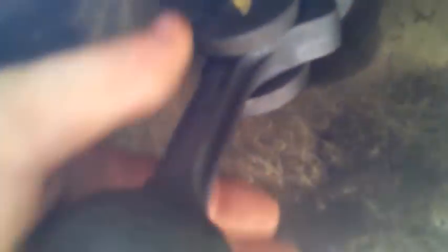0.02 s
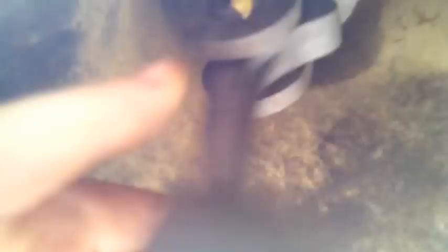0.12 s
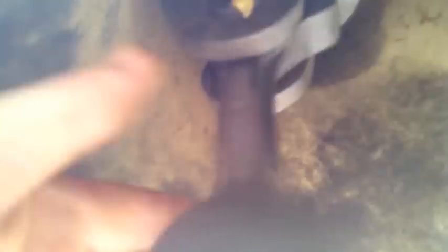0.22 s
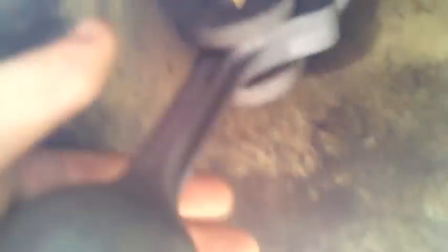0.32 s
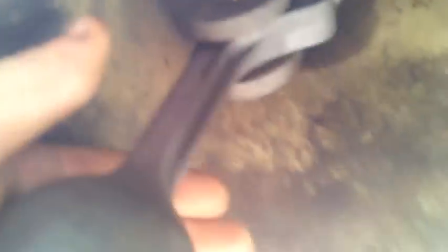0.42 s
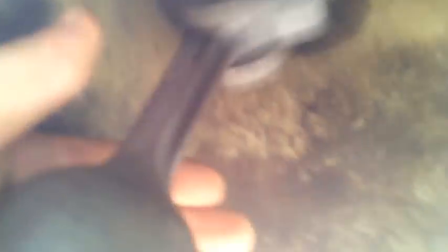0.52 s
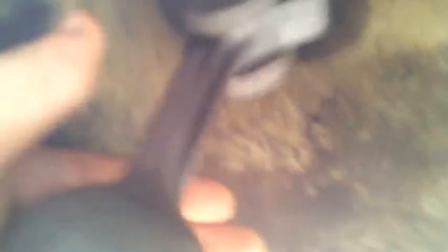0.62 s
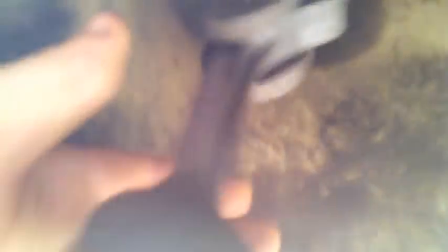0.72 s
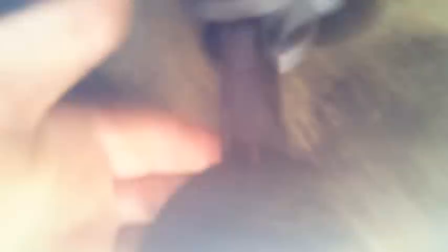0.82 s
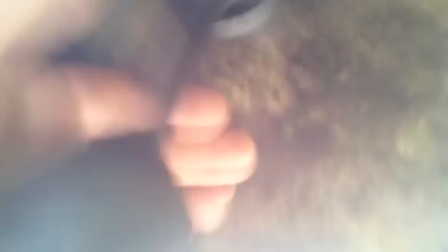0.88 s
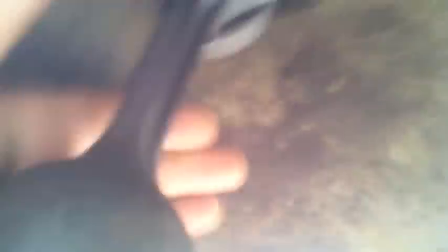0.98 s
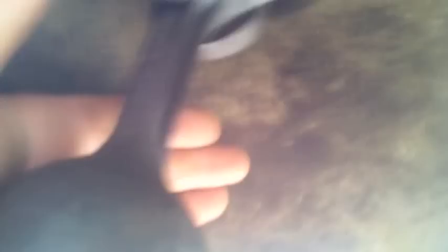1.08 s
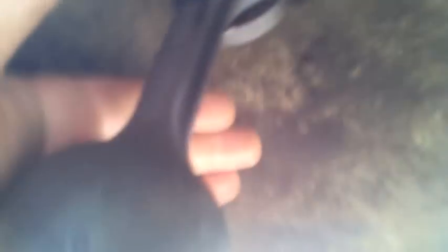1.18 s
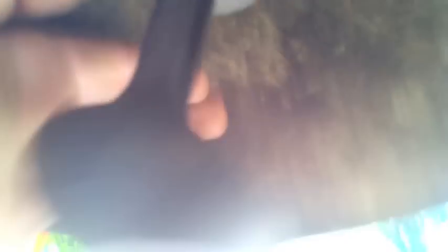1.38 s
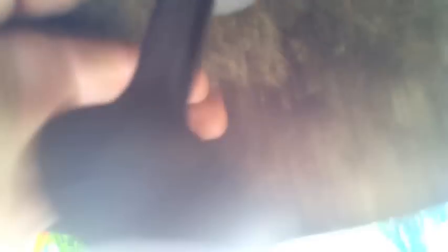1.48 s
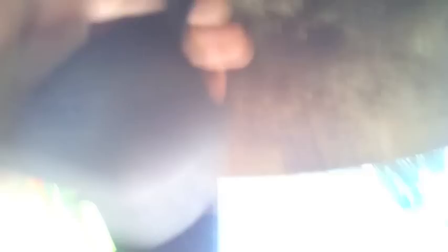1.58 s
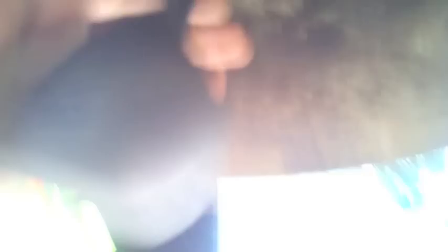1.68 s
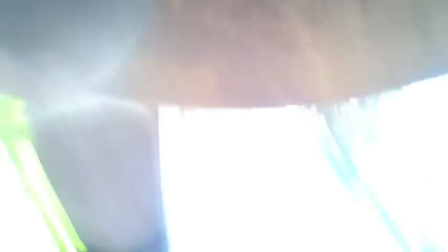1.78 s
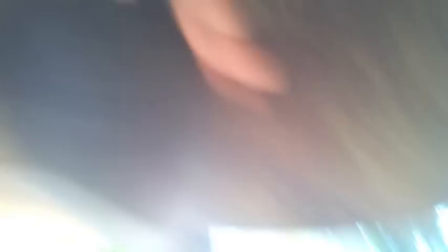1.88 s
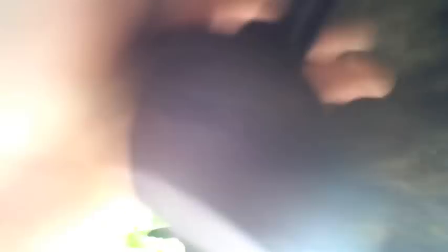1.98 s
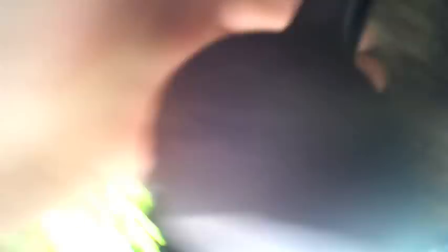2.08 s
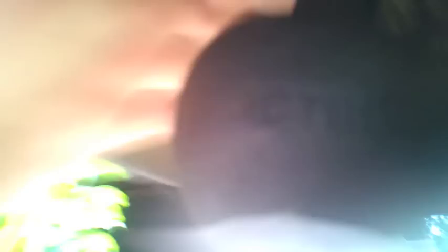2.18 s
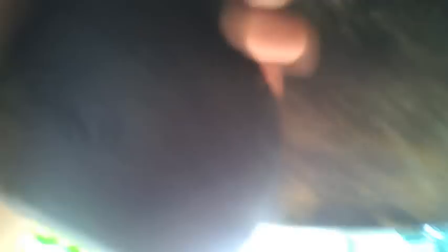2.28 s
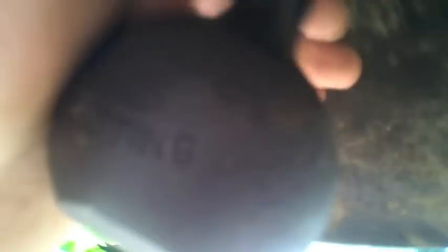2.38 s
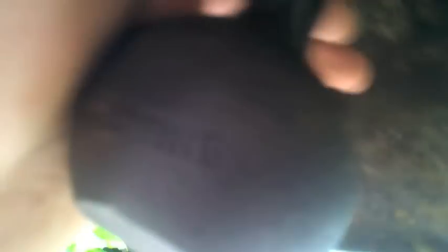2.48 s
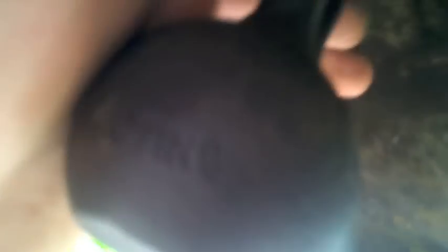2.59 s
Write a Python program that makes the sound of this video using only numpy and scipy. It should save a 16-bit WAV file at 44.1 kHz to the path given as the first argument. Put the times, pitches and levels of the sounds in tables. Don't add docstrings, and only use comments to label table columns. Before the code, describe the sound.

An air-driven clapper strikes a damped steel bell steadily, bouncing lightly and hissing, over a faint compressor drone

```python
import sys
import numpy as np
from scipy import signal
from scipy.fft import rfft, irfft
from scipy.io import wavfile
from scipy.ndimage import map_coordinates

SR = 44100
rng = np.random.default_rng(int(sys.argv[2]) if len(sys.argv) > 2 else 0)


def master_out(mix):
    frames = np.transpose(np.atleast_2d(mix))
    ceiling = np.clip(frames, -1, 1)
    pcm = np.round(ceiling * 32767).astype(np.int16)
    wavfile.write(sys.argv[1], SR, pcm)


def boost(x):
    u = np.asarray(x, float) / 20
    return 10 ** u


N = 114660

# t/s, level/dB, low thump/dB, long ring/dB, valve tick/dB
BLOWS = [
    (0.2007, -13, -28, -46, -33),
    (.8500, -13, -18, -43, -31),
    (1.4969, -14.5, -14.5, -47.5, -30),
    (2.1439, -13, -27.5, -38.5, -33),
]
# t/s, level/dB, clink f/Hz, clink level/dB
REBOUNDS = [
    (0.268, -32, 4180, -38),
    (0.922, -36, 4210, -35),
    (1.5686, -31, 4000, -31),
    (2.2189, -32, 4170, -26),
]
# t/s, level/dB, after-hiss/dB, ring from the piston's return/dB
PUFFS = [
    (.358, -20.5, -35.5, -52),
    (1.009, -20, -38, -48),
    (1.654, -20.5, -43.5, -54.5),
    (2.302, -20, -40.5, -62),
]

BELL_HZ = [2091, 3811, 5175, 5620, 5921, 6097, 7461, 7667, 9078, 9396, 9467, 10970, 12010, 12440]
# level/dB, time to fade by 60 dB/s
BELL_RING = [(-51, .6), (-48, .8), (-37, .22), (-44, .35), (-37, .27), (-36, .65), (-48, .3), (-22, .3),
             (-42, .5), (-33, .2), (-35, .45), (-38, .35), (-38, .45), (-44, .4)]
LONG_HZ = [3585, 3589]
# level/dB, time to fade by 60 dB/s
LONG_RING = [(3, 1.05), (-8, .9)]
CLAPPER_HZ = [1265, 1420, 1582, 1695, 2790, 2920, 3480, 5885, 6860, 8610, 9275, 9776, 12225, 13100]
# level/dB, time to fade by 60 dB/s
CLAPPER_RING = [(-26, 0.15), (-9, 0.023), (-36.5, 0.16), (-49.5, 0.3), (-40, .08), (-43, .07), (-30, .05),
                (-28, 0.13), (-49, 0.11), (-36, 0.14), (-10.5, 0.047), (-32, 0.37), (-27, 0.16), (-51, .25)]
YOKE_HZ = [600, 380]
# level/dB, time to fade by 60 dB/s
YOKE_RING = [(-1, .025), (-6, 0.047)]
YOKE_DB = [-9, -22, -20, -24]

# f/Hz, level/dB per Hz
CRACK_COLOUR = [(300, 7), (600, -5.5), (1400, -6), (2200, -8), (3400, 0.5), (5000, -6.5), (9300, -1),
                (14000, -5)]
# f/Hz, level/dB per Hz
THUMP_COLOUR = [(40, -13), (100, 17.5), (150, 1), (300, 3.5), (550, -3), (800, -9), (1500, -24.5)]
# f/Hz, level/dB per Hz
KNOCK_COLOUR = [(150, -28), (380, 11), (700, -27), (1150, 2), (2000, -8), (4200, -3), (7000, -12),
                (11000, -8)]
# f/Hz, level/dB per Hz
AIR_COLOUR = [(200, -32.5), (380, -2), (700, -20), (1200, -4), (2000, -15.5), (3000, -0.5), (4500, -12),
              (9000, -4.5)]
# f/Hz, level/dB per Hz
HISS_COLOUR = [(500, -20), (1500, 5.5), (2200, -7.5), (3000, 2), (4500, -19), (6000, 0.5), (9000, 4),
               (13000, 8.5)]
# f/Hz, level/dB per Hz
YARD_COLOUR = [(40, -3.5), (130, -5), (500, -4.5), (1000, -15), (1500, -13), (2500, -16.5), (6000, -24.5),
               (12500, -11)]
# f/Hz, level/dB
FAR_SHADE = [(100, -11.5), (350, -9.5), (900, -11.5), (1700, -6.5), (2400, -2), (3000, 1), (6000, -9.5),
             (13000, -16)]

DRONE_ORDERS = [2, 3, 4, 5, 6, 7, 8, 9, 10, 11, 12, 14, 15, 16, 17, 18, 19, 24, 28, 33]
DRONE_DB = [-59.5, -53, -54.5, -66, -54.5, -64, -52.5, -64, -59, -62.5, -65, -65.5, -67.5, -88, -57.5, -68,
            -69, -75, -69, -67.5]
# t/s, level/dB
WHINE = [(0, -57.5), (.3, -60.5), (.75, -56), (1.15, -58.5), (1.4, -60.5), (1.9, -65.5), (2.6, -65.5)]


def envelope(starts, dbs, rise, hold, t60):
    t = np.arange(N) / SR - np.array(starts)[:, None]
    attack = np.clip(t / rise, 0, 1) ** 2
    fade = boost(-60 * np.clip(t - rise - hold, 0, None) / t60)
    return boost(np.array(dbs, float)) @ (attack * fade)


def drift(rate):
    knots = rng.standard_normal(int(rate * N / SR) + 3)
    return map_coordinates(knots, [np.arange(N) * rate / SR], order=3)


def colour(points):
    hz, db = np.transpose(points)
    bin_hz = np.arange(N // 2 + 1) * SR / N
    return boost(np.interp(np.log(bin_hz + 1), np.log(hz), db))


def noise(spectrum):
    white = rng.standard_normal((2, N))
    x = irfft(rfft(white) * colour(spectrum), N)
    return x / x.std()


def ring(starts, dbs, hzs, modes):
    scatter_db = 1.5
    out = np.zeros((2, N))
    at = (np.array(starts) * SR).astype(int)
    luck = rng.standard_normal((len(at), len(modes), 3))
    for k, (hz, (db, t60)) in enumerate(zip(hzs, modes)):
        strength = boost(np.array(dbs) + db + scatter_db * luck[:, k, :2].T)
        far_sign = np.sign(luck[0, k, 2])
        clicks = np.full((2, N), 1e-18)
        clicks[:, at] = strength * np.array([[1], [far_sign]])
        r = boost(-60 / (t60 * SR))
        w = 2 * np.pi * hz / SR
        out += signal.lfilter([0, np.sin(w)], [1, -2 * r * np.cos(w), r * r], clicks)
    return out


def blows():
    s, db, low, long, tick = np.transpose(BLOWS)
    tick_lead_s, earlier_ring_db = 0.0094, -57
    valve = noise(HISS_COLOUR) * envelope(s - tick_lead_s, tick, 0.0005, 0.00069, 0.035)
    grit = boost(3.5 * drift(700))
    hit = envelope(s, db, 0.00046, 0.0035, 0.025)
    rattle = envelope(s, db - 15, 0.0023, 0.012, 0.11)
    crack = noise(CRACK_COLOUR) * grit * (hit + rattle)
    thump = noise(THUMP_COLOUR) * envelope(s, low, 0.00204, 0.0048, 0.023)
    force_db = db - db.mean()
    bell = ring(s + 0.0011, force_db, BELL_HZ, BELL_RING)
    yoke = ring(s + 0.0016, YOKE_DB, YOKE_HZ, YOKE_RING)
    clapper = ring(s + 0.0027, force_db, CLAPPER_HZ, CLAPPER_RING)
    long_ring = ring(np.r_[0, s + 0.001], np.r_[earlier_ring_db, long], LONG_HZ, LONG_RING)
    return valve + crack + thump + bell + yoke + clapper + long_ring


def rebounds():
    s, db, clink_hz, clink_db = np.transpose(REBOUNDS)
    knock = noise(KNOCK_COLOUR) * envelope(s, db, 0.0014, 0.0056, 0.071)
    clink_ring = [(5, 0.035), (-17, 0.025), (-10.5, 0.19), (-1, 0.04)]   # level/dB, fade/s
    clinks = np.zeros((2, N))
    for start, hz, level in zip(s, clink_hz, clink_db):
        tones = [hz, hz * 1.04, 1148, 10800]
        clinks += ring([start, start + 0.00205], [level, level - 3], tones, clink_ring)
    bell = ring(s, db + 9, BELL_HZ, BELL_RING)
    return knock + clinks + bell


def exhaust():
    s, db, after, jolt = np.transpose(PUFFS)
    flutter = boost(0.83 * drift(300))
    puff = noise(AIR_COLOUR) * flutter * envelope(s, db, 0.005, 0.0032, 0.074)
    flicker = boost(1.0 * drift(15))
    hiss = noise(HISS_COLOUR) * flicker * envelope(s, after, 0.019, 0.028, 1.3)
    piston = ring(s + 0.004, jolt, LONG_HZ + [6097], LONG_RING + [(-4.5, 0.52)])
    return puff + hiss + piston


def compressor():
    drone_hz, sag_hz_per_s, stroke_s = 44.83, 0.025, 0.018
    odd_turn, spread = 1.05, 0.0131
    far_lag_s, far_db = 0.0001, 0
    t = np.arange(N) / SR - np.array([[0], [far_lag_s]])
    turn = 2 * np.pi * (drone_hz * (t - stroke_s) - sag_hz_per_s * t ** 2 / 2)
    drone = np.zeros((2, N))
    for k, db in zip(DRONE_ORDERS, DRONE_DB):
        level = boost(db + 1 * drift(8.2))
        drone -= level * np.cos(k * turn + odd_turn * (k % 2) + spread * k * k)
    whine_db = np.interp(t[0], *np.transpose(WHINE)) + 2.5 * drift(14.05)
    whine = boost(whine_db) * np.sin(2 * np.pi * 1390 * t + 0.34 * drift(5.2))
    return (drone + whine) * boost(np.array([[0], [far_db]]))


def yard():
    level_db, alike = -51, 0.41
    murmur = noise(YARD_COLOUR)
    murmur[1] = alike * murmur[0] + np.sqrt(1 - alike ** 2) * murmur[1]
    return boost(level_db + 1.0 * drift(10.46)) * murmur


def scene():
    ringer = blows() + rebounds() + exhaust()
    body_cut = signal.butter(2, 120, "high", fs=SR, output="sos")
    near, far = signal.sosfilt(body_cut, ringer)
    shaded = irfft(rfft(far) * colour(FAR_SHADE), N)
    return np.array([near, shaded]) + compressor() + yard()


def low_pass(x):
    return signal.sosfilt(signal.butter(12, 15060, fs=SR, output="sos"), x)


def record(dry):
    cross_lag = 17
    top = 1.05
    crossed = dry - np.roll(dry[::-1], cross_lag, axis=1)
    soft = top * np.tanh(crossed / top)
    top_cut = signal.cheby2(16, 70, 14450, fs=SR, output="sos")
    mix = signal.sosfilt(top_cut, soft)
    return low_pass(mix)


dry = scene()
out = record(dry)
master_out(out)
```